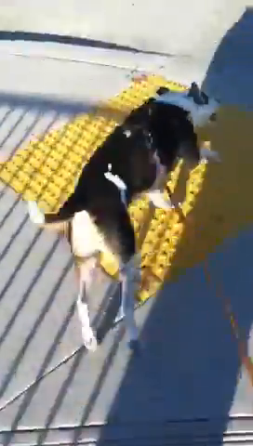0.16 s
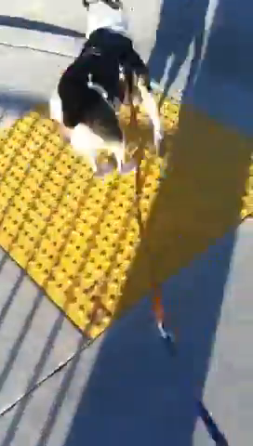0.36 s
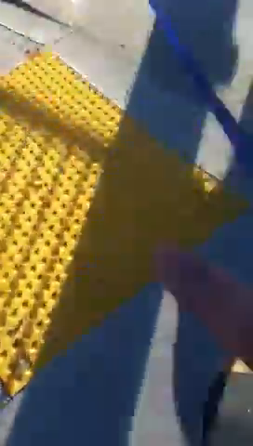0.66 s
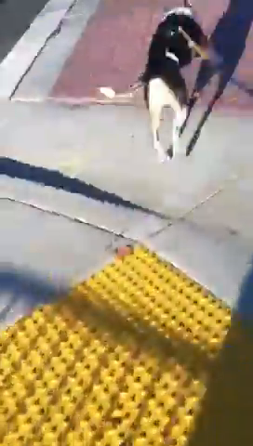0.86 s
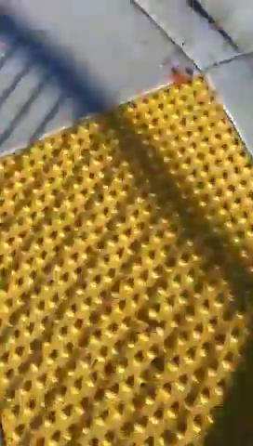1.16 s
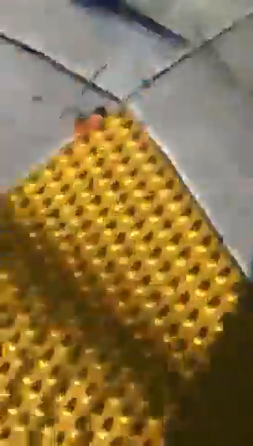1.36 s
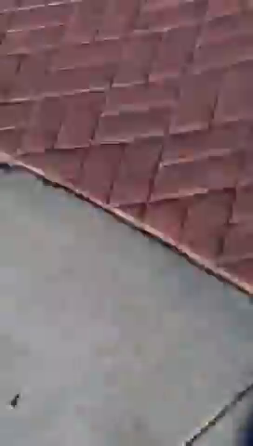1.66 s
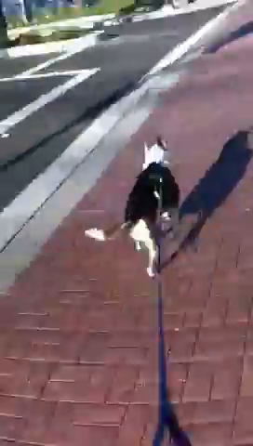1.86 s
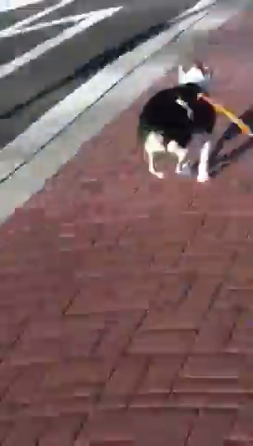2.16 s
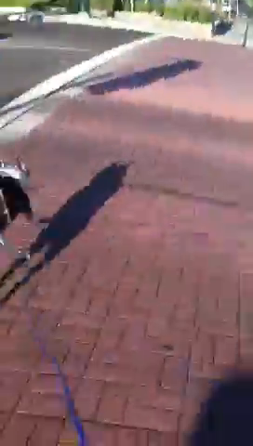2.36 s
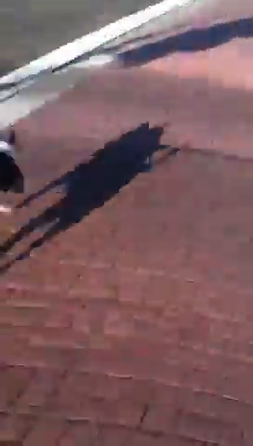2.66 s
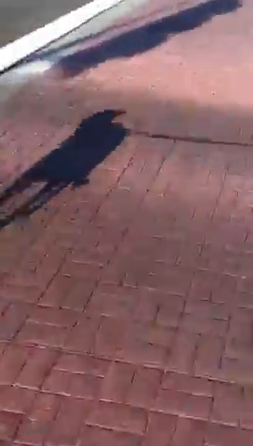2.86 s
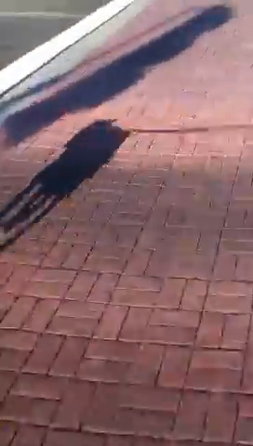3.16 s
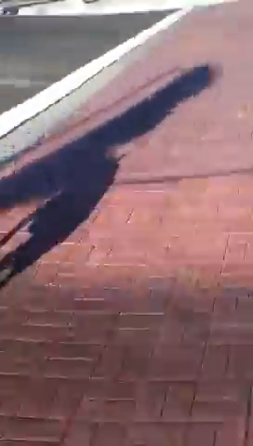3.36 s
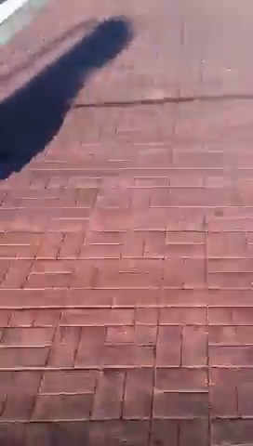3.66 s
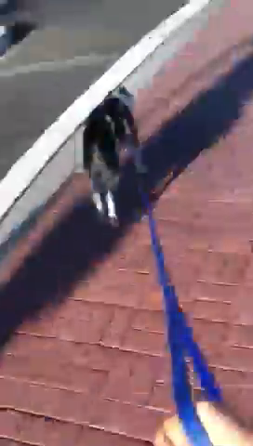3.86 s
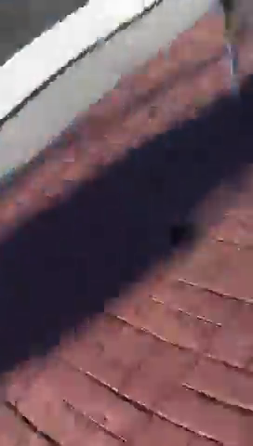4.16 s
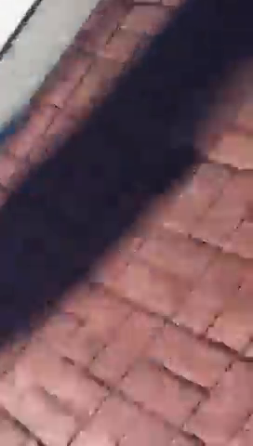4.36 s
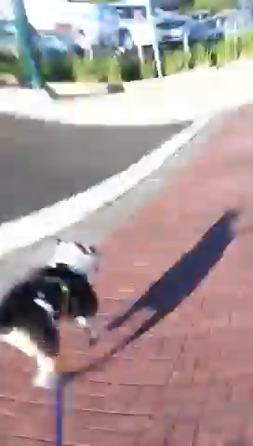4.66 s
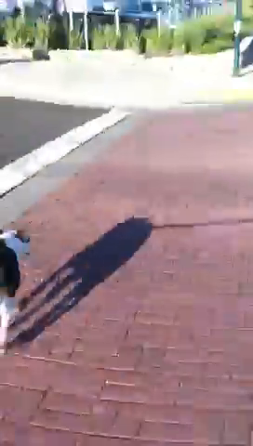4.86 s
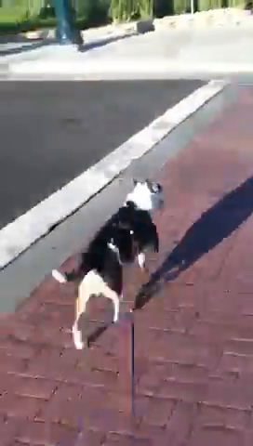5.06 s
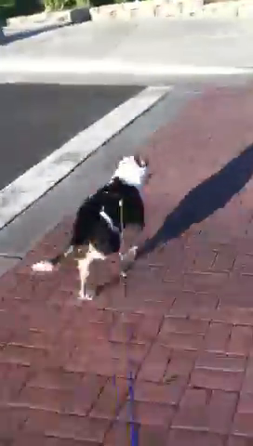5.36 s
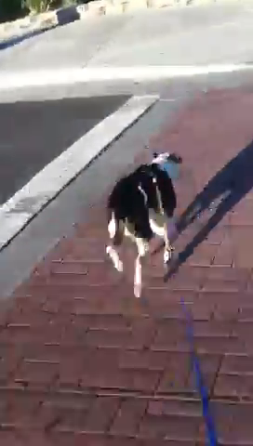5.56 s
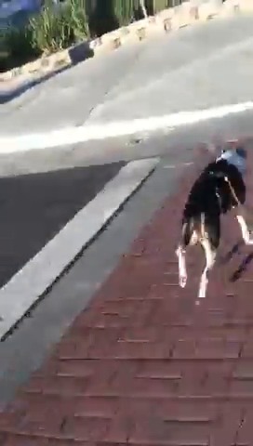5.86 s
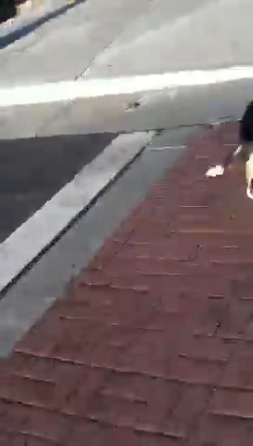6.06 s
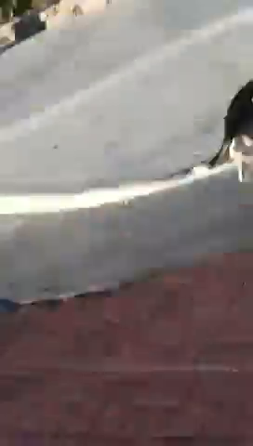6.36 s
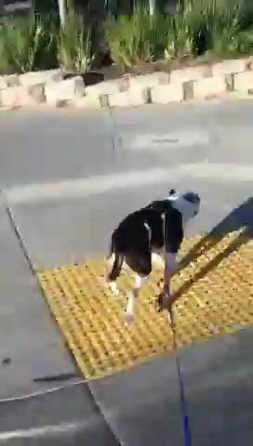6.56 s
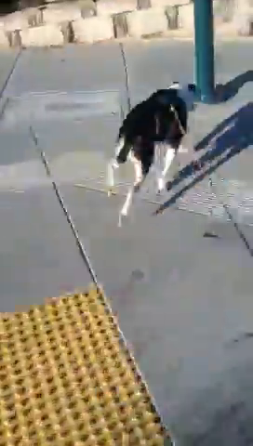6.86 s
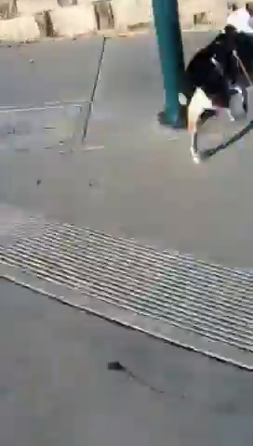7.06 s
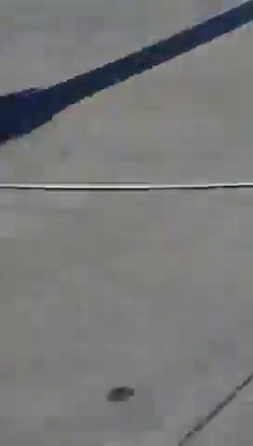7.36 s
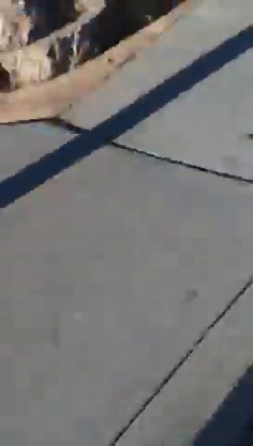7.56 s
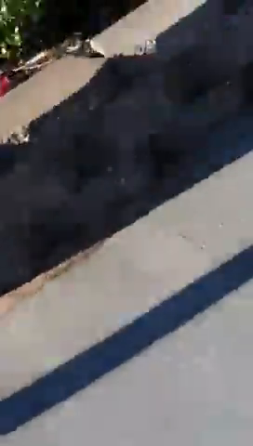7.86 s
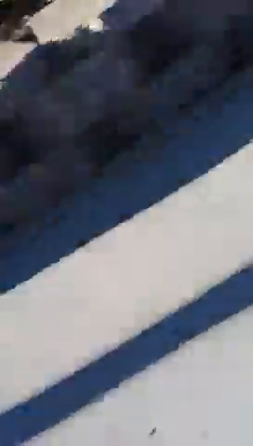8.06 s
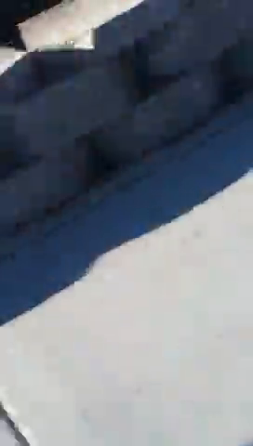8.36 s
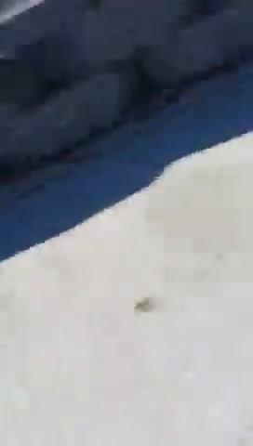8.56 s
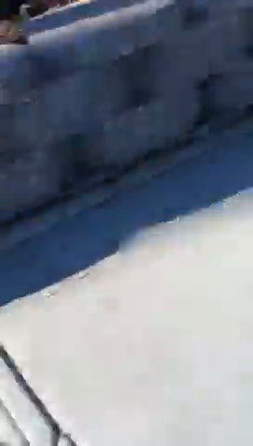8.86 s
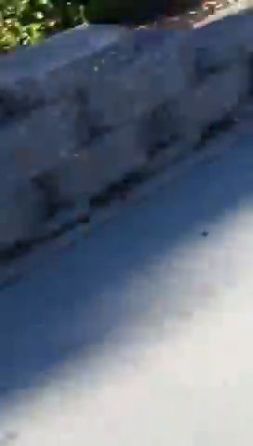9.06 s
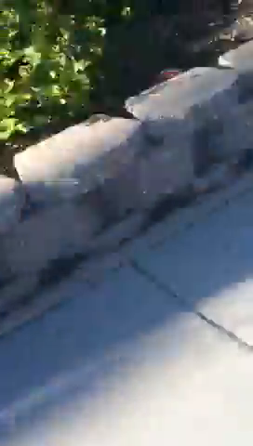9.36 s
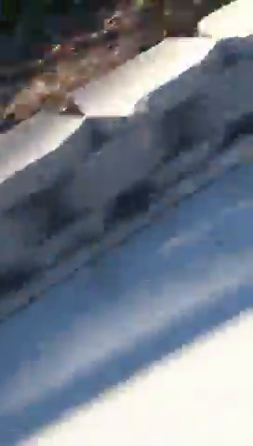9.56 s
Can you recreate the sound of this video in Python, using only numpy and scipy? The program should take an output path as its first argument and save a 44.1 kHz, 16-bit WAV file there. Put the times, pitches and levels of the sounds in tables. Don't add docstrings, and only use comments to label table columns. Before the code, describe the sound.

A skateboard rattles hard over studded tiles and bumpy brick paving, then smooths into concrete slabs with paired joint knocks and a lid's clatter.

```python
import sys
import numpy as np
from scipy import signal
from scipy.fft import rfft, irfft
from scipy.io import wavfile
from scipy.ndimage import uniform_filter1d, minimum_filter1d

SR = 44100
rng = np.random.default_rng(int(sys.argv[2]) if len(sys.argv) > 2 else 0)


def boost(x):
    u = np.asarray(x, float) / 20
    return 10 ** u


def store_pcm(level_fs):
    pcm = np.round(np.clip(level_fs, -1, 1) * 32767).astype(np.int16)
    wavfile.write(sys.argv[1], SR, np.atleast_2d(pcm).T)


N = 428652
RISE_S = 0.0015

# (frequency [Hz], width [Hz], level [dB])
WHEELS = [(770, 233, 6), (989, 313, 2.5), (1500, 376, -6.5), (2176, 390, -16), (2916, 680, -19.5)]
# (frequency [Hz], density [dB per Hz])
GRIT = [(1470, 7), (2500, 6), (3070, -2), (3980, 1.5), (9370, -7.5), (12900, -20.5), (15500, -46)]


def evened(x):
    return x / np.sqrt(np.mean(x ** 2) + 1e-20)


def add(mix, start_s, sound):
    part = mix[round(start_s * SR):][:len(sound)]
    part += sound[:len(part)]


def coloured(x, spectrum):
    point_hz, point_db = np.transpose(spectrum)
    hz = np.fft.rfftfreq(len(x), 1 / SR)
    gain_db = np.interp(np.log(hz + 1), np.log(point_hz + 1), point_db, left=-90, right=-90)
    return evened(irfft(rfft(x) * boost(gain_db), len(x)))


def resonate(x, hz, width_hz):
    pole = np.exp((-np.pi * width_hz + 2j * np.pi * hz) / SR)
    return 2 * signal.lfilter([1 - abs(pole)], [1, -pole], x).real


def body(x, modes):
    total = 0
    for k, (hz, width_hz, db) in enumerate(modes):
        ring = resonate(resonate(x, hz, width_hz), hz, 2 * width_hz)
        total = total + (-1) ** k * boost(db) * ring
    return evened(total)


def loosened(x, modes, loose):
    wide = [(hz, 1.34 * width_hz, db) for hz, width_hz, db in modes]
    return (1 - loose) * body(x, modes) + loose * body(x, wide)


def bumps(per_s, spread_db, decay_s, steady):
    struck = rng.random(N) < per_s / SR
    size = boost(spread_db * np.minimum(rng.exponential(1, N), 2.3)) * struck
    fall = np.exp(-1 / (decay_s * SR))
    jolts = signal.lfilter([1], np.convolve([1, -fall], [1, -fall ** 3]), size)
    return steady + evened(jolts)


def swell(t, rise_s, decay_s):
    shape = (1 - np.exp(-t / rise_s)) * np.exp(-(t / decay_s) ** 1.12)
    return shape / shape.max()


def street():
    # (frequency [Hz], density [dB per Hz])
    hum_spectrum = [(59, -35), (104, -2), (193, 6.5), (552, 2.5), (703, -1), (6380, -27), (12200, -33.5),
                    (15500, -46.5)]
    # (time [s], level [dB])
    wind_curve = [
        (0.0, -70),
        (1.62, -49),
        (6.5, -50),
        (6.77, -24.5),
        (7.45, -46.5),
        (9.72, -44),
    ]
    t = np.arange(N) / SR
    gusts = rng.standard_normal(N) * bumps(per_s=15, spread_db=4.0, decay_s=0.02, steady=0.5)
    lumps = resonate(resonate(gusts, 130, 130), 130, 130)
    wind = evened(lumps + 0.12 * resonate(rng.standard_normal(N), 30, 40))
    wind_db = np.interp(t, *np.transpose(wind_curve))
    hum_db = -42 - 5 * np.clip((t - 0.48) / 0.21, 0, 1)
    return boost(hum_db) * coloured(rng.standard_normal(N), hum_spectrum) + boost(wind_db) * wind


def jingle():
    shake = bumps(per_s=11, spread_db=-10.0, decay_s=0.0012, steady=0)
    treble = resonate(resonate(rng.standard_normal(N), 10500, 5400), 10000, 7000)
    return boost(-75) * evened(shake * treble)


def trucks():
    # (time [s], peak [dB], pitch [Hz], crack level [dB])
    clacks = [(0.098, -24, 840, -59), (0.215, -35, 2390, -41), (0.353, -35, 2360, -50),
              (0.3535, -31, 5250, -60), (0.4627, -33, 5170, -51), (0.494, -25, 3390, -30),
              (0.505, -9, 1600, -38), (0.5095, -7, 1440, -38), (1.1778, -19, 2130, -38),
              (1.193, -28, 2260, -13), (1.204, -12, 1810, -20), (1.306, -32, 1500, -28),
              (1.356, -29, 1460, -27), (1.382, -25, 1420, -25.5), (1.558, -10.5, 1700, -27.5),
              (1.6623, -28, 1840, -56), (1.731, -26, 1500, -35), (1.7463, -10.5, 2080, -21),
              (1.7973, -26, 1570, -53), (1.923, -24, 1430, -30), (1.919, -11.5, 2010, -14.5),
              (2.1153, -31, 3300, -57), (2.609, -30, 1560, -34), (2.718, -24, 1800, -32),
              (4.365, -23.5, 2350, -39), (4.946, -19, 1400, -32), (7.301, -13, 1390, -49),
              (9.064, -12, 1420, -44), (9.072, -13.5, 1060, -46), (9.1627, -24, 1500, -41),
              (9.256, -37, 1850, -39), (9.6337, -40.5, 1460, -38), (9.662, -9, 1500, -26.5)]
    crack_modes = [(1200, 600, 2), (2200, 800, 0), (3500, 1100, -6)]  # (Hz, width Hz, dB)
    out, t = np.zeros(N), np.arange(1500) / SR
    for start_s, db, hz, crack_db in clacks:
        crack = body(rng.standard_normal(len(t)), crack_modes)
        ping = np.sin(2 * np.pi * hz * t) + 0.32 * body(rng.standard_normal(len(t)), [(hz, 600, 0)])
        clack = boost(db - 3.0) * ping * swell(t, RISE_S, 0.0022)
        add(out, start_s, clack + boost(crack_db) * crack * swell(t, RISE_S, 0.0049))
    return out


def claws():
    # (time [s], peak [dB])
    touches = [(0.2187, -28), (0.3358, -30), (0.353, -24), (0.419, -28.5), (0.4522, -31.5), (0.4934, -33),
               (0.616, -26), (1.1606, -39), (1.1744, -27.5), (1.3046, -28), (1.359, -23), (1.495, -36),
               (1.548, -26.5), (2.818, -40), (3.3889, -35.5), (4.495, -35.5), (6.3172, -42), (6.3396, -42),
               (6.5985, -39), (6.633, -34)]
    # (time [s], peak [dB])
    trot = [(7.2871, -41), (7.367, -42), (7.645, -39), (7.701, -35.5), (7.8414, -43), (8.032, -36),
            (8.218, -45), (8.2743, -39.5), (8.3367, -39), (8.5368, -47), (8.6136, -37), (8.6605, -39),
            (8.7563, -38), (8.8251, -38), (8.873, -35.5), (9.1544, -38), (9.207, -35), (9.2337, -41.5),
            (9.266, -37), (9.4133, -41), (9.4886, -36), (9.534, -36), (9.6652, -47)]
    out, t = np.zeros(N), np.arange(1500) / SR
    for start_s, db in touches + trot:
        spray = evened(resonate(resonate(rng.standard_normal(len(t)), 9500, 6000), 8000, 9000))
        add(out, start_s, boost(db - 12) * spray * swell(t, 0.001, 0.0049))
    return out


def clinks():
    out, t = np.zeros(N), np.arange(600) / SR
    for hz in np.geomspace(900, 3800, num=12):
        struck = rng.random(N) < 14 / SR
        strikes = boost(4.5 * np.minimum(rng.exponential(1, N), 3)) * struck
        ping = (900 / hz) ** 1.8 * np.sin(2 * np.pi * hz * t) * swell(t, 0.0005, 0.0018)
        out += signal.oaconvolve(strikes, ping)[:N]
    return evened(out)


def rolling():
    # (frequency [Hz], width [Hz], level [dB])
    deck_modes = [(569.4, 102, 12), (470, 168, 6), (624, 82, -0.5)]
    thud_modes = [(298.8, 55, 9), (181, 76.5, 4), (120, 37, -11.5)]
    # (frequency [Hz], width [Hz], level [dB])
    whirr_modes = [(1040, 450, 1.5), (1430, 460, -6), (2000, 150, -26)]
    # (frequency [Hz], width [Hz], level [dB])
    flex_modes = [(393, 76, 0)]
    # (frequency [Hz], width [Hz], level [dB])
    plate_modes = [(1120, 120, -2.5), (880, 220, -0.5), (2210, 83, -13.5)]
    # (time [s], half length [s], level [dB])
    lifts = [(0.68, 0.056, -6.5), (0.956, 0.1, -5), (1.713, 0.015, -5), (2.011, 0.026, -12),
             (2.093, 0.084, -3.5), (2.48, 0.068, -2.5), (3.137, 0.015, -7.5), (4.344, 0.0044, -5),
             (7.276, 0.015, -11), (7.483, 0.028, -9)]
    # (time [s], level [dB])
    shake_curve = [(0.46, -46), (0.53, -25), (0.67, -16), (0.96, -25.5), (1.34, -24), (2.12, -25),
                   (2.58, -19.5), (3.23, -21), (3.77, -18.5), (3.96, -16), (4.39, -24.5), (5.53, -20.5),
                   (6.43, -20), (7.05, -21), (7.34, -31.5), (7.65, -38), (8.25, -33), (9.72, -33.5)]
    # (start [s], thud [dB], rattle [dB], grit [dB], whirr [dB])
    ground = [
        (0.0, -11.5, -11, -26, -36),
        (1.05, -8.5, -9.5, -21.5, -35),
        (2.05, -9.5, -10, -31, -23.5),
        (4.5, -5.5, -7.5, -31.5, -18),
        (6.62, 1.5, -9.5, -30.5, -20),
        (7.3, -4.5, -11, -24.5, -13.5),
        (8.1, 1.5, -10.5, -24, -12),
    ]
    t = np.arange(N) / SR
    lift_db = sum(db * np.exp(-((t - at_s) / half_s) ** 2) for at_s, half_s, db in lifts)
    shake_db = np.interp(t, *np.transpose(shake_curve), left=-90) + lift_db
    start_s, *shares_db = np.transpose(ground)
    under = np.searchsorted(start_s, t, "right") - 1
    blend = int(0.25 * SR)
    thud_gain, rattle_gain, grit_gain, whirr_gain = (
        boost(shake_db + uniform_filter1d(db[under], size=blend)) for db in shares_db)

    smooth = np.clip((t - 7.2) / 0.086, 0, 1)
    fast = np.clip((t - 4.47) / 0.12, 0, 1) - smooth
    jolts = bumps(per_s=110, spread_db=0.0, decay_s=0.0048, steady=0.61) + 1.18 * smooth
    chips = bumps(per_s=120, spread_db=3.0, decay_s=0.0018, steady=0.8) + 1.18 * smooth
    noises = rng.standard_normal((5, N)) / (1 + smooth)
    deck_noise, thud_noise, wheel_noise, grit_noise, whirr_noise = noises

    ring = loosened(deck_noise * jolts, deck_modes, fast)
    flex = boost(-7.5) * fast * body(grit_noise * jolts, flex_modes)
    on_plate = np.clip((1.59 - t) * 10, 0, 1)
    plate = boost(-1.5) * on_plate * body(whirr_noise[::-1] * jolts, plate_modes)
    boom = loosened(thud_noise * (jolts + 0.5), thud_modes, fast + smooth)

    wheels = body(wheel_noise * (jolts + 9.0 * chips), WHEELS)
    wheels = wheels + boost(-13.5) * (1 - 1.1 * smooth) * jolts * clinks()
    whirr = body(whirr_noise * (jolts + chips), whirr_modes)

    drift = uniform_filter1d(uniform_filter1d(deck_noise[::-1], size=500), size=300)
    patches = boost(2.1 * evened(drift))
    grit = patches * coloured(grit_noise * (0.5 * jolts + chips), GRIT)
    return (boost(shake_db) * (ring + flex + plate) + thud_gain * boom
            + whirr_gain * whirr + rattle_gain * wheels + grit_gain * grit)


def knocks():
    # (time [s], peak [dB], deck pitch [Hz], length [ms])
    studs = [(0.476, -17.5, 478, 9.7), (0.538, -11.5, 550, 5.9), (0.563, -18.5, 507, 140),
             (0.594, -15.5, 513, 22), (0.63, -17.5, 462, 17), (0.681, -18, 574, 43), (0.764, -22, 550, 26),
             (1.099, -23.5, 611, 54), (1.161, -8, 545, 35), (1.268, -18.5, 623, 35),
             (1.307, -13.5, 740, 10), (1.36, -16.5, 765, 18), (1.498, -11.5, 494, 1),
             (1.661, -17, 600, 3.3), (1.833, -19.5, 544, 19), (1.933, 0, 560, 9.4), (0.71, -20, 590, 11),
             (0.839, -18, 557, 19), (0.897, -32, 580, 12), (1.39, -18.5, 544, 18), (1.555, -17, 600, 21),
             (2.023, -24, 585, 4.3), (2.116, -28, 605, 39)]
    # (time [s], peak [dB], deck pitch [Hz], length [ms])
    bricks = [(2.241, -18.5, 622, 17), (2.309, -12.5, 592, 40), (2.349, -5, 522, 6.1),
              (2.528, -21, 530, 67), (2.675, -9, 550, 18), (2.801, -16, 510, 2.9), (3.014, -9, 556, 4.3),
              (3.117, -11.5, 558, 7.9), (3.191, -12, 551, 11), (3.378, -15.5, 514, 2),
              (3.483, -12.5, 571, 59), (3.622, -10, 538, 10), (3.646, -3, 537, 1.4), (3.676, -13, 502, 18),
              (3.849, -7.5, 505, 8.2), (3.875, -10, 558, 11), (3.956, -18, 567, 11), (4.011, -3, 510, 3.9),
              (4.047, -12.5, 621, 36), (4.088, -5.5, 527, 17), (4.105, -8, 607, 7.4), (4.123, -5, 604, 6.5),
              (4.143, -11, 590, 12), (4.163, -14, 635, 6.6), (4.186, -6.5, 607, 7.2)]
    # (time [s], peak [dB], deck pitch [Hz], length [ms])
    far_bricks = [(4.418, -14.5, 540, 7), (4.467, -15, 553, 20), (4.537, -13.5, 550, 8.7),
                  (4.609, -10, 560, 4.9), (4.655, -22, 556, 72), (4.695, -0.5, 590, 7),
                  (4.765, -16, 493, 4.3), (4.806, -13, 414, 9.3), (4.906, -10, 624, 5),
                  (5.019, -23, 510, 8.5), (5.099, -17, 470, 20), (5.285, -9.5, 535, 4.2),
                  (5.369, -9, 513, 4.3), (5.441, -20, 536, 8), (5.564, -7, 545, 10), (5.61, -7, 616, 8.2),
                  (5.693, -15, 586, 7.1), (5.979, -8, 480, 2.4), (6.017, -8, 514, 7.3),
                  (6.073, -10, 408, 9.2), (6.112, 0.5, 493, 5.5), (6.176, -13, 503, 14),
                  (6.252, -18.5, 409, 32)]
    # (time [s], peak [dB], deck pitch [Hz], length [ms])
    ramp = [(6.56, 0, 587, 3.7), (6.596, -6, 610, 3.8), (6.697, -13, 442, 25), (6.737, -5, 407, 6.3),
            (6.756, -15, 497, 3.6), (6.924, -5, 463, 5.6), (6.988, 8.5, 484, 3.6), (7.076, -6, 560, 4),
            (8.465, -15, 560, 7.6), (7.183, -28, 597, 37), (7.3, -8.5, 540, 1.7), (9.072, -20, 440, 4),
            (7.637, -18.5, 550, 4.9), (8.234, -22, 484, 14), (8.66, -25.5, 560, 16), (9.163, -16, 552, 7.3),
            (9.251, -15.5, 531, 9.6), (9.41, -24, 550, 17)]
    # (time [s], front [dB], rear [dB], axle delay [s], front pitch [Hz])
    slabs = [(7.37, -5.5, -5.5, 0.074, 474), (7.656, -8.5, -0.5, 0.077, 550), (7.844, -10, -5, 0.075, 513),
             (8.451, -8.5, -7, 0.077, 460), (8.873, -8.5, 1.5, .072, 480), (8.987, -10, -9, 0.079, 550),
             (9.588, -5, -4, 0.075, 550)]
    rear_hz = [560, 590, 590, 480, 560, 480, 610]
    # (thud [dB], rattle [dB])
    blows = [
        (-0.5, 0),
        (-6, -9),
        (-4.5, -5.5),
        (-6, -8),
        (-8, -6.5),
    ]
    out, t = np.zeros(N), np.arange(3000) / SR
    axles = [(s, db, hz, 5.7) for s, db, _, _, hz in slabs]
    axles += [(s + delay_s, db, hz, 6.2) for (s, _, db, delay_s, _), hz in zip(slabs, rear_hz)]
    axles += [(s + 0.011, db - 9, 580, 6) for s, db, *_ in slabs]
    for rows, (thud_db, rattle_db) in zip((studs, bricks, far_bricks, ramp, axles), blows):
        thud_hz = 250 + 51 * (rows is axles)
        for (start_s, db, hz, ms), chance in zip(rows, rng.random((len(rows), 5))):
            length_s = ms / 1000
            scatter_db = 6 * (chance[3:] - 0.5)
            second_hz = hz * (0.8 + 0.089 * chance[0])
            second = np.sin(2 * np.pi * (second_hz * t + chance[1]))
            ring = np.sin(2 * np.pi * hz * t) + 0.39 * second
            thud = np.sin(2 * np.pi * (thud_hz + 60 * chance[2]) * t)
            noise = rng.standard_normal((2, len(t)))
            rattle = body(noise[0], WHEELS) + boost(-23.5) * coloured(noise[1], GRIT)
            blow = ring * swell(t, RISE_S, length_s)
            blow += boost(thud_db + scatter_db[0]) * thud * swell(t, 0.0046, 0.51 * length_s)
            rattle_gain = boost(rattle_db - 5.0 + scatter_db[1])
            blow += rattle_gain * rattle * swell(t, 2 * RISE_S, 0.64 * length_s)
            add(out, start_s, boost(db) * blow)
    return out


def gaps():
    # (time [s], rattle peak [dB], deck ring [dB])
    stud_gaps = [(0.508, -5, -40), (0.537, -32, -30), (0.575, -20, -21), (0.603, -21, -20),
                 (0.629, -8, -18), (0.679, -12, -5), (0.759, -29, -3), (0.842, -23, -14), (0.894, -24, -14),
                 (0.986, -20, -28), (0.524, -16, -24), (0.563, -15, -17), (1.105, -16, -33),
                 (1.109, -9, -4), (1.163, -16, -27), (1.176, -16, -13), (1.266, -17, -9), (1.304, -25, -6),
                 (1.359, -5, -21), (1.498, -11.5, -29), (1.556, -8.5, -30), (1.629, -31, -5),
                 (1.662, -28, -4.5), (1.723, -19, -14.5), (1.747, -11, -20), (1.836, -9.5, -10),
                 (1.92, -24, -1), (2.133, -30, -8)]
    # (time [s], rattle peak [dB], deck ring [dB])
    brick_gaps = [(2.302, -8, 3.5), (2.35, -25, -22), (2.453, -26, -12), (2.559, -14, -13),
                  (2.631, -11, -15.5), (2.651, -16, -3), (2.673, -3.5, -4), (2.7, -8, -17),
                  (2.75, -10, -9.5), (2.967, -7, -4.5), (2.989, -12, -17), (3.013, -10, -8),
                  (3.091, -9, -7.5), (3.168, -12, -16), (3.198, -5.5, -29), (3.247, -13, -30),
                  (3.271, -15, -17), (3.304, -2.5, -19), (3.343, -11, -21), (3.43, -12, -8),
                  (3.48, -7.5, -9), (3.499, -11, -7), (3.534, -2.5, 0), (3.574, -7.5, -22),
                  (3.625, -4.5, -11), (3.679, -18.5, -4), (3.734, -30, -20.5), (3.812, -13, -5),
                  (3.85, -18, -19), (3.873, -7.5, -4), (3.91, -7, -17), (3.923, -1.5, 2), (3.976, -20, -12),
                  (4, -4.5, -3), (4.047, -22, -10), (4.086, -7.5, -6), (4.141, -19, 0), (4.373, -11, -17)]
    # (time [s], rattle peak [dB], deck ring [dB])
    far_gaps = [(4.389, -11, -6.5), (4.418, -28, -4), (4.468, -25, -27), (4.497, -9, -14),
                (4.572, -13.5, -6), (4.61, -30, 3), (4.656, -24, -14), (4.692, -5, -15), (4.729, -13, -11),
                (4.78, -30, -10), (4.809, -31, -20), (4.864, -9, -7), (4.89, -19, -5), (4.907, 0.5, 2),
                (4.938, -36, -7), (5.017, -7.5, -5), (5.055, -12, -9), (5.098, -11, -5), (5.115, -6.5, -17),
                (5.146, -22, -5), (5.159, -10, -14), (5.184, -4.5, -9), (5.22, -10, -11), (5.246, -10, -22),
                (5.285, -18, -8), (5.355, -6, -18), (5.406, -14, -13), (5.42, -11, -5), (5.441, -6.5, -8),
                (5.454, -9, -3.5), (5.482, -14, -12), (5.497, -13, -6), (5.525, -5, -15), (5.565, -24, 2),
                (5.539, -7, -12), (5.584, -7, -13), (5.611, 3.5, -4), (5.624, -6, -3), (5.647, -9, -3),
                (5.667, -7, -3), (5.748, -18, -7), (5.789, -9, -18), (5.706, -1, 2), (5.775, -25, -17)]
    # (time [s], rattle peak [dB], deck ring [dB])
    ramp_gaps = [(5.817, -7, -21), (5.834, -18, -13), (5.861, -7, -16), (5.872, -13, -9), (5.917, -27, -22),
                 (5.939, -4.5, -29), (5.959, -12, -27), (5.978, -9, -14), (5.997, -29, -21),
                 (6.017, -2, -15), (6.063, -25, -18), (6.104, -5, -11.5), (6.113, -9, 1), (6.151, -12, -13),
                 (6.192, -4, -11), (6.249, -9, -9), (6.266, -7, -5.5), (6.036, -11, -3), (6.164, -8, -9),
                 (6.224, -11, -17), (6.323, -24, -17), (6.338, -4, -14), (6.376, -13, -9),
                 (6.419, -7.5, -4), (6.447, -11, -13), (6.484, -13.5, -24), (6.503, -10, -13),
                 (6.53, -13, -12), (6.821, -10, -3.5), (6.862, -12, -14), (6.89, -3.5, -7),
                 (7.012, -13, -6), (7.04, -9, -7), (6.599, -18, -1), (6.64, -10.5, -15), (6.676, -23, -6),
                 (6.689, -23, -5), (6.717, -6, -23), (6.741, -3.5, -8), (6.759, -6, -7), (6.778, -12, -13),
                 (6.807, -7.5, -12), (6.878, -10, -11), (6.923, -11, -2), (6.949, -4.5, -18),
                 (6.987, -10, -11), (7.074, -19, -27), (7.11, -21, -5.5), (7.12, -20, -7), (7.169, -24, -6),
                 (7.184, -30, -3), (7.198, -29, -2)]
    out, force, t = np.zeros(N), np.zeros(N), np.arange(1500) / SR
    rows = stud_gaps + brick_gaps + far_gaps + ramp_gaps
    for (start_s, rattle_db, ring_db), chance in zip(rows, rng.random((len(rows), 2))):
        hz = 573.3 + 95 * (chance[0] - 0.5)
        phase = 2 * np.pi * (hz * t + chance[1])
        overtone = boost(rattle_db - 14.5) * np.sin(2 * phase)
        ring = boost(ring_db - 4.5) * np.sin(phase) + overtone
        add(out, start_s, ring * swell(t, RISE_S, 0.0046))
        add(force, start_s, boost(rattle_db - 13.5) * swell(t, 0.00037, 0.0047))
    wheel_noise, grit_noise = rng.standard_normal((2, N))
    rattle = body(wheel_noise, WHEELS[1:]) + boost(-24.0) * coloured(grit_noise, GRIT)
    return out + force * rattle


def chatter():
    # (time [s], peak [dB])
    slaps = [(7.548, -27), (7.575, -28.5), (8.68, -19), (8.874, -23), (8.886, -13), (8.896, -19),
             (8.905, -18), (8.919, -10.5), (8.93, -15), (8.941, -11), (8.946, -3), (8.965, -15),
             (8.971, -26), (8.984, -15), (8.993, -8.5)]
    # (frequency [Hz], width [Hz], level [dB])
    lid_modes = [(550, 107, 16.5), (1000, 400, 1), (1460, 480, 3.5), (2500, 1400, -9.5),
                 (3950, 2000, -19.5)]
    out, t = np.zeros(N), np.arange(1500) / SR
    decay_s = 0.004
    for start_s, db in slaps:
        slap = body(rng.standard_normal(len(t)), lid_modes)
        add(out, start_s, boost(db) * slap * swell(t, decay_s / 6, decay_s))
    return out


def scene():
    hits = trucks() + claws() + knocks() + gaps() + chatter()
    hits = signal.sosfilt(signal.butter(2, 140, "high", fs=SR, output="sos"), hits)
    t = np.arange(4000) / SR
    echo = rng.standard_normal(len(t)) * boost(-60 * t / 0.035) * (t > 0.003)
    wet = signal.oaconvolve(hits, echo / np.linalg.norm(echo))[:N]
    return (hits + boost(-14.0) * wet + rolling() + street() + jingle())[None]


def band_limit(x):
    return signal.sosfilt(signal.butter(12, 15790, fs=SR, output="sos"), x)


def record(dry):
    heard = signal.sosfilt(signal.butter(3, 85, "high", fs=SR, output="sos"), dry)
    heard = signal.sosfilt(signal.butter(4, 12800, fs=SR, output="sos"), heard)
    push_band = signal.butter(1, [15, 45], "band", fs=SR, output="sos")
    heard = heard + boost(-26.5) * signal.sosfilt(push_band, np.minimum(heard ** 2, 0.5))
    ceiling = 0.71
    gain = minimum_filter1d(ceiling / np.maximum(abs(heard), ceiling), size=161)
    return band_limit(heard * uniform_filter1d(gain, size=161))


dry = scene()
out = record(dry)
store_pcm(out)
```